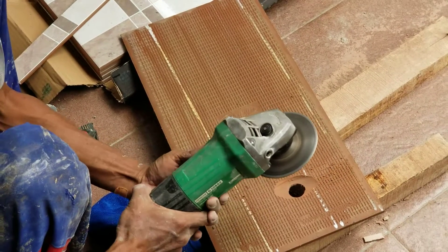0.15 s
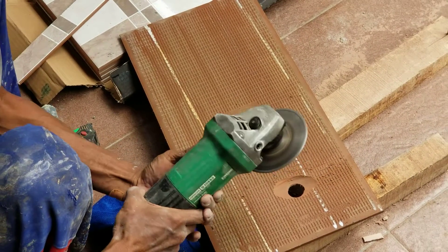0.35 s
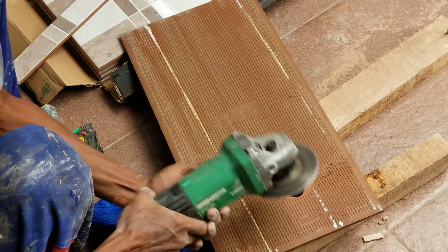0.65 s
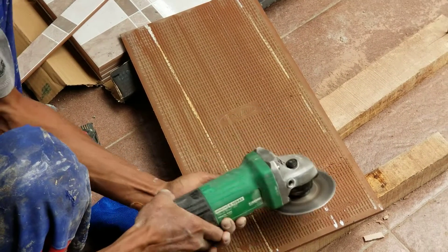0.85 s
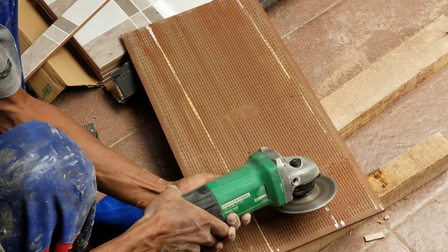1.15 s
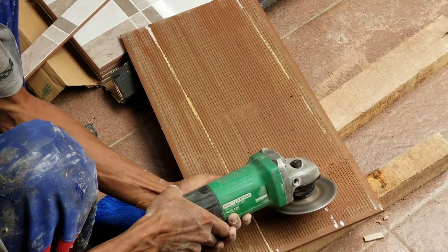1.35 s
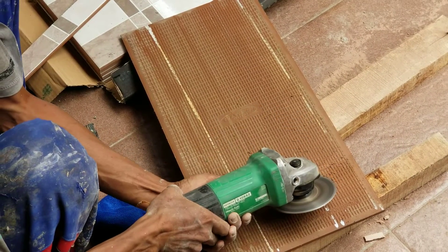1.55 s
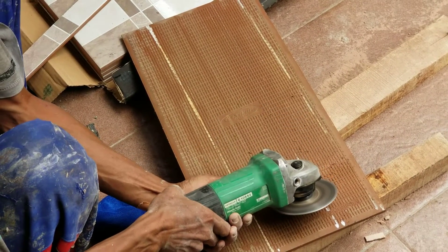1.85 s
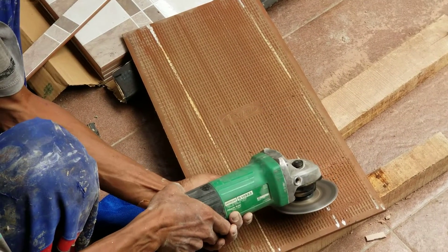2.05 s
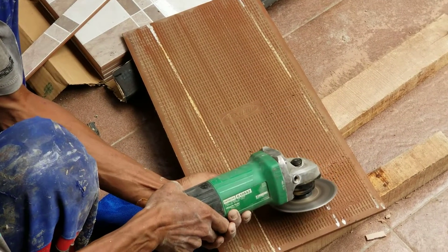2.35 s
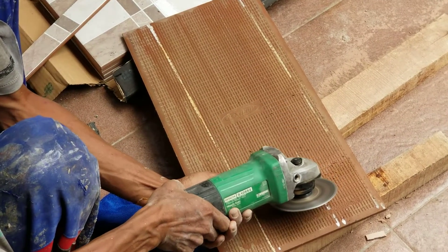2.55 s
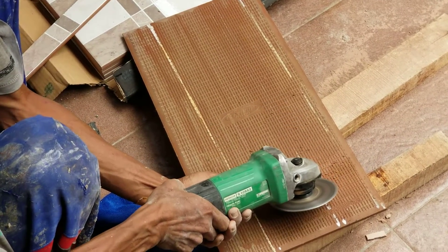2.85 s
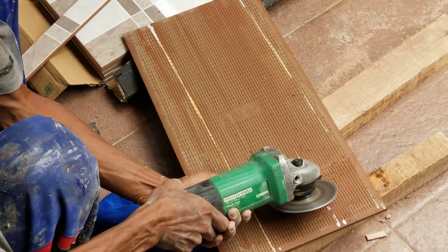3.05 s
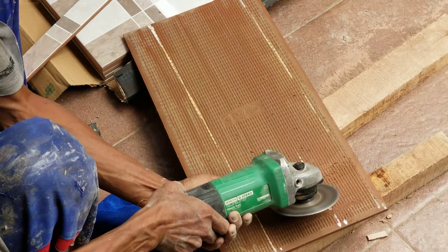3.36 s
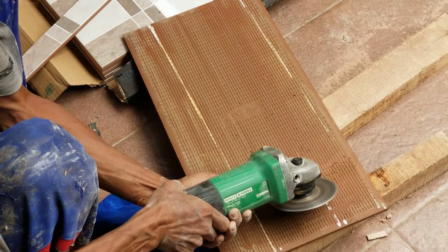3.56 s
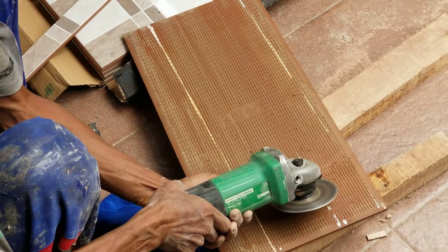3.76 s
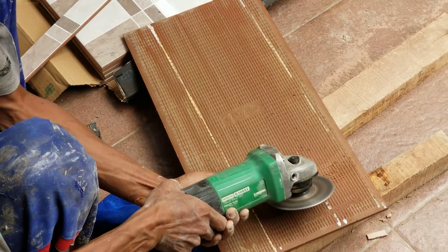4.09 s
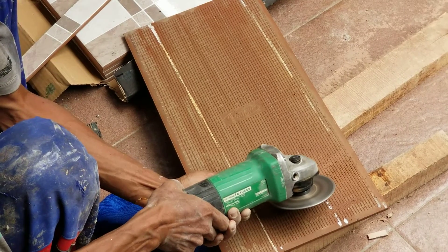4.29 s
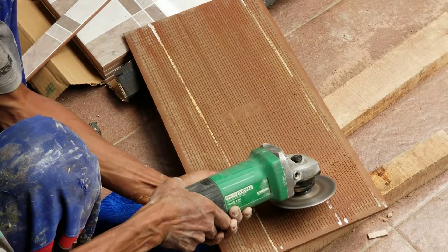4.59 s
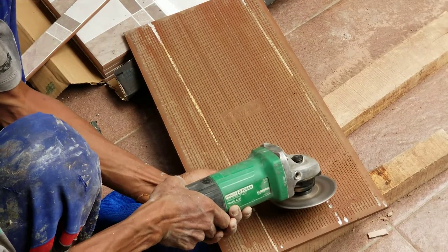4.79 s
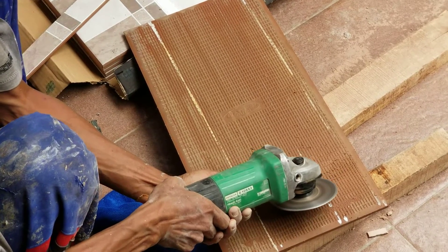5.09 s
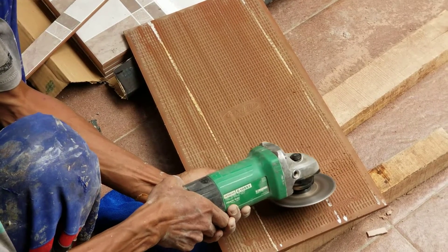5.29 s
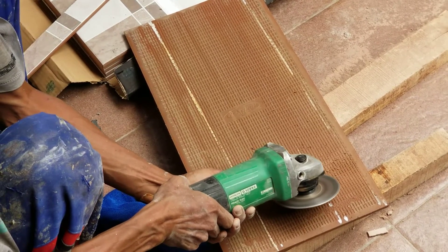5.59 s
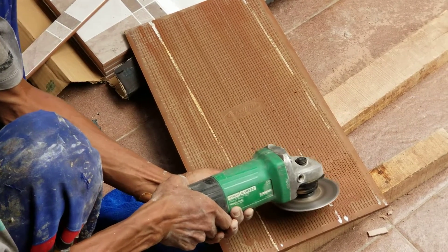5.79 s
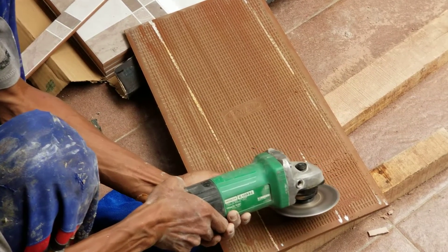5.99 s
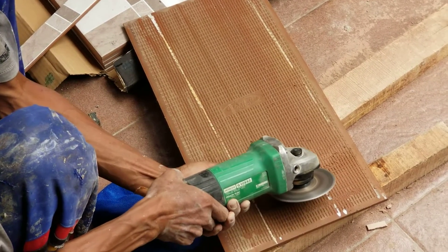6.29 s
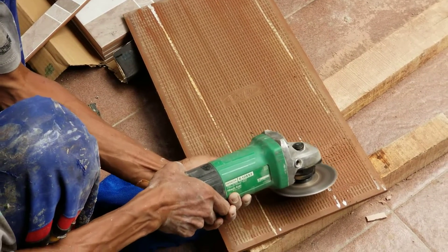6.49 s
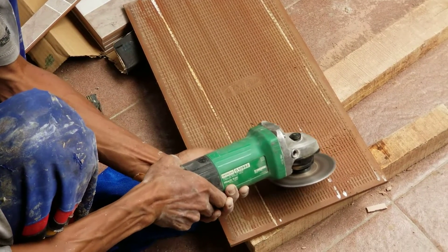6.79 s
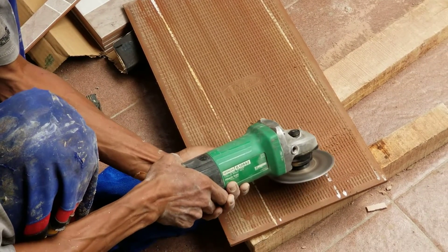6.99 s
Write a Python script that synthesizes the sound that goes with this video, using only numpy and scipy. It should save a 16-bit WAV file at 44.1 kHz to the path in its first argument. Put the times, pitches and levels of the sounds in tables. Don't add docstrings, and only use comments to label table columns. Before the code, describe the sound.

An angle grinder switches on with a jerk, whines up to speed, then grinds a ceramic tile in seven harsh, ringing passes.

```python
import sys
import numpy as np
from scipy import signal
from scipy.fft import rfft, irfft, next_fast_len
from scipy.io import wavfile
from scipy.ndimage import uniform_filter1d

SR = 44100
rng = np.random.default_rng(int(sys.argv[2]) if len(sys.argv) > 2 else 0)


def log_audio(samples):
    frames = np.atleast_2d(samples).T
    limited = np.clip(frames, -1, 1)
    pcm = np.round(limited * 32767).astype(np.int16)
    wavfile.write(sys.argv[1], SR, pcm)


def nominal_scale(level):
    x = np.asarray(level, float) / 20
    return 10 ** x


N = 314874
TIME = np.arange(N) / SR

# (time [s], grit level [dB])
PASSES = [
    [(1.45, -48), (1.574, -28), (1.63, -26), (1.808, -21.5), (1.868, -21), (2.08, -24.5), (2.13, -62)],
    [(2.365, -22.5), (2.389, -29.5), (2.547, -20.5), (2.729, -21), (2.777, -21.5), (2.8, -23), (3.161, -19),
     (3.287, -20), (3.33, -44)],
    [(3.57, -33), (3.648, -26.5), (3.81, -20), (3.856, -24.5), (3.93, -42)],
    [(4.08, -26.5), (4.112, -39), (4.22, -21.5), (4.25, -25), (4.308, -22), (4.402, -23), (4.878, -19.5),
     (4.974, -23.5), (5.06, -39)],
    [(5.22, -50), (5.27, -27), (5.356, -22.5), (5.424, -20), (5.72, -21.5), (5.755, -17), (5.84, -20.5),
     (5.915, -28), (5.96, -57)],
    [(6.295, -20), (6.317, -22.5), (6.46, -22), (6.495, -18.5), (6.525, -17), (6.55, -24), (6.597, -24),
     (6.635, -58)],
    [(6.925, -19.5), (6.989, -28), (7.005, -19), (7.1, -19.5), (7.2, -27)],
]
# (low modes [dB rel], 3rd multiple [dB], 4th at touch [dB], 7th [dB], 12th [dB])
SEATING = [(-15, -46, -41, -41, -55), (-12, -49, -46, -46, -45.5), (-20, -47, -47, -42, -47),
           (-9, -46, -41.5, -63, -44), (-11.5, -38.5, -40, -56, -45), (-10.5, -48, -42.5, -48, -36.5),
           (-14, -49, -46, -50, -39.5)]
# (3rd multiple [dB/s], 7th [dB/s], treble modes [dB rel], rumble [dB rel], 2nd multiple [dB rel])
SEATING_SHIFT = [(3, -5.5, 0.5, 2.5, -4), (6.5, 0.5, 2.5, 1.5, -5.5), (-10, -6, 1, 0.5, -3),
                 (1.5, 5, 1, 1.5, 2), (-18.5, -29, -0.5, -2, -5.5), (37, -40, -1, -3, -3),
                 (-34, -30, -1, -4, -2)]
# (frequency [Hz], width [Hz], level [dB])
DISC = [(2200, 95, -9), (2390, 56, -10), (3390, 70, -9), (3600, 32, -3), (4220, 71, -5), (4530, 90, -1.5),
        (4890, 43, -1), (5610, 66, -2), (6140, 48, -15), (6720, 55, -17), (7210, 86, -14), (7660, 130, -28),
        (8120, 64, -22), (8490, 48, -16), (8750, 54, -21), (9360, 42, -12), (9730, 130, -24),
        (10200, 58, -21), (10500, 39, -24), (11000, 140, -15), (11300, 39, -21), (12030, 55, -6),
        (12900, 67, -14), (13630, 110, -6.5), (14600, 45, -16), (15000, 58, -12), (15600, 110, -13)]
# (frequency [Hz], width [Hz], level [dB])
FLANGE = [(3610, 26, -6.5), (3790, 35, -10), (3980, 40, -8), (4340, 40, -7), (4505, 28, -1), (4655, 40, -5),
          (4950, 26, -5), (5260, 300, -15), (5640, 14, -3.5)]
# (frequency [Hz], width [Hz], level [dB])
TILE = [(315, 42, -15), (668, 147, -5), (1029.5, 17.5, 4.5), (1274, 22, 6), (1440, 160, 0.5), (1464, 51, 7)]
# (frequency [Hz], level [dB per Hz])
DUST = [(120, -71), (200, -93), (480, -13.5), (526, -24.5), (758, -31), (1150, -12), (1440, -6.5),
        (2980, -5), (4540, 9), (5250, -17), (7290, -6.5), (7700, -64), (13300, 0), (15700, -57)]
FULL_PRESSURE_DB = -21
TREBLE_DB, TREBLE_FOLLOWS = -7, -0.38
LOW_FOLLOWS, LOW_WANDER_DB = -0.2, 5
RUMBLE_DB, RUMBLE_FADE_DB_PER_S = -10.5, 3
RUMBLE_FOLLOWS = -0.8

# (multiple of the disc speed [1], level [dB])
OTHER_MULTIPLES = [(5, -51), (6, -76), (8, -42), (9, -47.5), (11, -46), (13, -46), (14, -38), (24, -29.5),
                   (25, -56)]
SECOND_DB = -55.5
FOURTH_FADE_DB_PER_S2, TWELFTH_WANDER_DB = 80, 3.5
TWELFTH_MODE_HZ, TWELFTH_MODE_WIDTH_HZ = 2190, 60

# (time [s], speed [turns/s])
FREE_SPEED = [(0.21, 160), (0.3, 305), (0.35, 378), (0.45, 440), (0.55, 482), (0.65, 503), (0.9, 548),
              (1.1, 570), (1.4, 594)]
# (time [s], speed [turns/s])
LOADED_SPEED = [(1.5, 182.5), (2.09, 181), (2.39, 182.5), (2.84, 181.6), (3.29, 178.9), (3.6, 182.4),
                (3.89, 179.8), (4.11, 182.7), (4.414, 180.8), (4.576, 173.9), (4.714, 171.2), (5.26, 174.1),
                (5.37, 176), (5.55, 174.2), (5.89, 173.3), (6.32, 178.1), (6.55, 180.3), (7.0, 182.5)]
GEAR_RATIO, PINION_TEETH, MAINS_PULSE_HZ = 3.265, 11, 100
SWITCH_S, SPEED_SETTLE_S = 0.2138, 0.04

# (time [s], tile [dB], gear case [dB], bright metal [dB], chatter [ms])
BLOWS = [
    (0.2147, -26, -17, -34, 1.6),
    (0.994, -48.5, -39, -15, 6.8),
    (1.452, -38.5, -38, -12.5, 6.5),
    (2.369, -29.5, -19, -22, 1.8),
    (3.575, -34, -24, -26, 3.7),
    (4.089, -50, -37, -7, 1.6),
    (5.245, -38.5, -39, -38, 75),
    (5.321, -42.5, -13, -29.5, 2.7),
    (6.298, -33, -29, -38, 6.8),
    (6.925, -34, -31, -32, 2),
]
# (time [s], gear case rattle [dB])
RUN_UP = [(0.214, -30), (0.3, -25), (0.385, -17), (0.49, -25), (0.535, -21), (0.56, -27), (0.575, -18.5),
          (0.64, -23), (0.912, -38)]
# (frequency [Hz], width [Hz], level [dB])
GEAR_CASE = [(4250, 225, 6.5), (4684, 43, 4.5), (696, 81, -13), (1230, 850, -16.5)]
# (frequency [Hz], width [Hz], level [dB])
GUARD = [(12130, 260, 0), (12380, 260, -1), (15450, 400, -9)]
COASTING_RATTLE_DB = -36.5
WHINE_DB, WHINE_BEST_HZ, WHINE_BELOW_DB_PER_OCT, WHINE_ABOVE_DB_PER_OCT = -31.5, 3900, 4, 28
COASTING_GUARD_DB, GUARD_DB, GUARD_PEAK_DB, GUARD_PEAK_S, GUARD_SPAN_S = -38.5, -37, 9.5, 0.5, 0.15
GUARD_ENTERS_S, GUARD_MUTED_DB = 0.37, -7

# (frequency [Hz], level [dB per Hz])
FAN = [(24, -64), (40, -19), (162, -32), (370, -15.5), (440, -17.5), (595, -9), (657, -17), (980, -10.5),
       (1500, -12), (2020, 0.5), (3020, -0.5), (4610, -1), (8000, -20.5), (14200, -14), (15700, -20)]
COASTING_DB, POWERED_DB = -41.5, -33.5
COASTING_HOUSING_DB, POWERED_HOUSING_DB = -18, -12
LOAD_DUCK_DB, DUCK_RECOVER_S = -4, 0.23

# (time [s], left over right [dB], treble [dB rel])
AIM = [(0.15, 8.5, -1.5), (0.25, 10, -4.5), (0.46, 15, -0.5), (1.31, 5, -5), (1.44, 4.5, -5),
       (2.3, 6.5, -4), (4, 5.5, -5), (6.1, 6.5, -6), (6.8, 5.5, -4.5)]
# (frequency [Hz], lead of the left [rad])
LEAD = [(0, 0), (2410, -0.5), (2930, 1.9), (3960, 1.6), (4570, 0.8), (5600, 1.9), (6720, 0.6), (8440, -6.6),
        (10200, -3.8), (11000, -6.5), (12500, -4.7), (13600, -6.1), (14600, -5.6), (16100, -11.8)]
# (frequency [Hz], left over right [dB])
SIDES = [(60, -4), (110, -1), (200, 7.5), (380, 5), (700, 5.5), (1290, 3), (2380, -1), (4400, 1.5),
         (8120, 6), (15000, 3)]
# (frequency [Hz], share of power [0-1])
UNLIKE = [(60, 0.35), (300, 0.025), (1000, 0.18), (4000, 0.18), (8000, 0.1), (12000, 0.088)]
# (time [s], level [dB])
HANDLING = [(0, -55), (0.6, -48), (0.75, -56), (1.1, -71.5), (6.9, -70), (7.14, -53)]
MIC_LOW_HZ, MIC_HIGH_HZ = 150, 15720


def rms_one(x):
    return x / np.sqrt(np.mean(x ** 2) + 1e-20)


def in_time(rows):
    s, *columns = np.transpose(rows)
    return [np.interp(TIME, s, column) for column in columns]


def at_hz(points, hz):
    table_hz, value = np.transpose(points)
    return np.interp(np.log(hz + 1), np.log(table_hz + 1), value)


def lag(x, seconds):
    r = np.exp(-1 / (max(seconds, 0.005) * SR))
    return signal.lfilter([1 - r], [1, -r], x)


def drift(rate):
    r = np.exp(-40 * np.pi * rate / SR)
    noise = rng.standard_normal(N // 20 + 4002)
    slow = signal.lfilter([1], [1, -2 * r, r * r], noise)[4000:]
    return np.interp(np.arange(N) / 20, np.arange(len(slow)), rms_one(slow))


def filtered(x, order, hz, kind):
    return signal.sosfilt(signal.butter(order, hz, kind, fs=SR, output="sos"), x)


def colour(x, spectrum):
    size = next_fast_len(N)
    gain = nominal_scale(at_hz(spectrum, np.fft.rfftfreq(size, 1 / SR)))
    return rms_one(irfft(rfft(x, size) * gain, size)[:N])


def resonate(x, modes, wander_db=0.0):
    out = np.zeros(N)
    for k, (hz, width, db) in enumerate(modes):
        r = np.exp(-np.pi * max(width, 5) / SR)
        drive = x * nominal_scale(db + (wander_db * drift(16.4) if wander_db else 0))
        peak = [(1 - r * r) / 2, 0, (r * r - 1) / 2]
        ring = [1, -2 * r * np.cos(2 * np.pi * hz / SR), r * r]
        out += (-1) ** k * signal.lfilter(peak, ring, drive)
    return out


def noise_gain(modes):
    return np.sqrt(sum(np.pi * width / SR * nominal_scale(2 * db) for hz, width, db in modes))


def grit(per_s, spread_db):
    sizes = nominal_scale(spread_db * np.minimum(rng.exponential(1, N), 5)) * rng.choice([-1, 1], N)
    return rms_one(sizes * (rng.random(N) < per_s / SR))


def mains_throb(depth_db):
    beat = MAINS_PULSE_HZ * (TIME - SWITCH_S) + 30
    kick = uniform_filter1d(1 - 2 * (beat % 1), size=60)
    strength = rng.standard_normal(N)[beat.astype(int)]
    return nominal_scale(depth_db * (1.3 * kick + 0.3 * strength))


def touching():
    edges = []
    for curve in PASSES:
        touch, lift = curve[0][0], curve[-1][0]
        edges += [(touch, 0), (touch + 0.003, 1), (lift - 0.03, 1), (lift, 0)]
    return in_time(edges)[0]


def grit_level():
    return in_time(np.vstack(PASSES))[0]


def this_pass(table):
    touches = np.array([curve[0][0] for curve in PASSES])
    index = np.maximum(np.searchsorted(touches, TIME) - 1, 0)
    return np.maximum(TIME - touches[index], 0), np.array(table)[index].T


def disc_angle():
    free = in_time(FREE_SPEED)[0] / GEAR_RATIO
    loaded = in_time(LOADED_SPEED)[0]
    return 2 * np.pi * np.cumsum(free + (loaded - free) * lag(touching(), SPEED_SETTLE_S)) / SR


def cutting(angle):
    grit_db = grit_level()
    since, seating = this_pass(SEATING)
    shift = this_pass(SEATING_SHIFT)[1]
    swing_db = grit_db - FULL_PRESSURE_DB
    treble_db = shift[2] + TREBLE_DB + TREBLE_FOLLOWS * swing_db
    low_db = seating[0] + LOW_FOLLOWS * swing_db + LOW_WANDER_DB * drift(1.7)
    tile_db = shift[3] + RUMBLE_DB + RUMBLE_FOLLOWS * swing_db - RUMBLE_FADE_DB_PER_S * since

    bite_db = 2.2 * np.cos(angle) + 1.3 * np.cos(2 * angle) + 0.9 * drift(34)
    force = touching() * nominal_scale(grit_db) * rms_one(nominal_scale(bite_db) * mains_throb(0.4))

    out = np.zeros(N)
    bands = [(0, 3100, low_db - 3.5), (3100, 6300, -2.05), (6300, 17000, treble_db - 0.6)]
    for low_hz, high_hz, band_db in bands:
        modes = [(hz, 0.64 * width, db) for hz, width, db in DISC + FLANGE if low_hz < hz < high_hz]
        grains = grit(9000, 2.97)
        out += resonate(grains * force * nominal_scale(band_db), modes, 2.37) / noise_gain(modes)
    grains = grit(3000, 1.7)
    out += resonate(grains * force * nominal_scale(tile_db - 4.5), TILE, 1.5) / noise_gain(TILE)
    dust = colour(grit(12000, 3.7), DUST)
    return out + force * nominal_scale(-3.5) * dust


def run_out(angle):
    since, (_, third_db, fourth_db, seventh_db, twelfth_db) = this_pass(SEATING)
    shift = this_pass(SEATING_SHIFT)[1]
    pressure_db = grit_level() + 19.04
    second_db = SECOND_DB + shift[4] + pressure_db
    third_db = third_db + shift[0] * since + 0.1 * pressure_db
    fourth_db = fourth_db - np.minimum(FOURTH_FADE_DB_PER_S2 * since ** 2, 16)
    seventh_db = seventh_db + shift[1] * since
    detune = (12 * in_time(LOADED_SPEED)[0] - TWELFTH_MODE_HZ) / TWELFTH_MODE_WIDTH_HZ
    twelfth_db = twelfth_db + 5.5 + 0.78 * pressure_db - 10 * np.log10(1 + detune ** 2)
    twelfth_db = twelfth_db + TWELFTH_WANDER_DB * drift(10.0)

    tones = [(2, second_db), (3, third_db), (4, fourth_db), (7, seventh_db), (12, twelfth_db)]
    tones += [(k, db + pressure_db + 2.5 * drift(3.8)) for k, db in OTHER_MULTIPLES]
    thump = np.zeros(N)
    for k, db in tones:
        level = np.sqrt(2) * nominal_scale(db + 1.9 * drift(12.5))
        thump += level * np.sin(k * angle + 1.1 * drift(2.3))
    return lag(touching(), 0.016) * thump


def blows():
    tile, case, metal = np.zeros(N), np.zeros(N), np.zeros(N)
    for at, tile_db, case_db, metal_db, ms in BLOWS:
        attack = np.clip((TIME - at) / 0.00051, 0, 1)
        shape = attack * np.exp(-np.clip(TIME - at, 0, 1) * 1000 / max(ms, 0.5))
        tile += shape * nominal_scale(tile_db)
        case += shape * nominal_scale(case_db)
        metal += shape * nominal_scale(metal_db)
    chatter, down = rng.standard_normal(N), touching()
    thud = nominal_scale(27.5) * resonate(tile * chatter, TILE) + nominal_scale(9.0) * tile * colour(chatter, FAN)
    bright_disc = [mode for mode in DISC if mode[0] > 6300]
    ring = nominal_scale(13.5) * resonate(metal * chatter * down, bright_disc)
    ring += nominal_scale(16) * resonate(metal * chatter * (1 - down), GUARD)
    clank = np.sin(2 * np.pi * 4330 * TIME) * (1 - down) + 3.3 * chatter
    return thud + ring + nominal_scale(9.5) * resonate(case * clank, GEAR_CASE[:2])


def gears(angle):
    on = TIME > SWITCH_S
    fade = np.clip((1.4 - TIME) / 0.3, 0, 1)

    octaves = np.log2(PINION_TEETH * in_time(FREE_SPEED)[0] / WHINE_BEST_HZ)
    whine_db = WHINE_DB + np.minimum(WHINE_BELOW_DB_PER_OCT * octaves, -WHINE_ABOVE_DB_PER_OCT * octaves)
    powered = np.clip((TIME - 0.22) / 0.002, 0, 1) * np.clip((0.75 - TIME) / 0.2, 0, 1)
    mesh = PINION_TEETH * GEAR_RATIO * angle + 1.45 * drift(200)
    teeth = np.sin(mesh) + 0.15 * np.sin(2 * mesh) + 0.087 * np.sin(3 * mesh)
    whine = rms_one(teeth * mains_throb(6.5)) * nominal_scale(whine_db + 9.5) * powered

    rattle_db = np.where(on, in_time(RUN_UP)[0], COASTING_RATTLE_DB)
    knocks = grit(6000, 2.5) * np.where(TIME > 0.21, mains_throb(6.0), 1)
    case = fade * nominal_scale(rattle_db - 1.0) * rms_one(resonate(knocks, GEAR_CASE, 1.3))

    guard_db = GUARD_DB + GUARD_PEAK_DB * np.exp(-((TIME - GUARD_PEAK_S) / GUARD_SPAN_S) ** 2)
    guard_db = guard_db + GUARD_MUTED_DB * (TIME < GUARD_ENTERS_S)
    guard_db = np.where(on, guard_db, COASTING_GUARD_DB)
    guard_db = fade * guard_db - 51 * (1 - fade)
    guard_knocks = grit(6900, 4.3) * mains_throb(3.4)
    guard = nominal_scale(guard_db + 1.0) * rms_one(resonate(guard_knocks, GUARD, 3.0))
    return whine + case + guard


def motor(angle):
    on = np.arange(N) > SWITCH_S * SR
    treble_db = in_time(AIM)[1]
    level_db = np.where(on, POWERED_DB, COASTING_DB)
    body_db = np.where(on, POWERED_HOUSING_DB, COASTING_HOUSING_DB)
    hiss = colour(rng.standard_normal(N), FAN) * mains_throb(1.4) * nominal_scale(1.06 * drift(42))
    high = filtered(hiss, 2, 5500, "high")
    body = filtered(hiss, 1, [650, 1700], "band")
    hiss = hiss + (nominal_scale(treble_db + 8.5) - 1) * high + (nominal_scale(body_db + 14.0) - 1) * body

    settled = np.clip((TIME - 0.75) / 0.15, 0, 1)
    unbalance = nominal_scale(-20.0 + 2.7 * drift(17)) * np.sin(GEAR_RATIO * angle) * settled
    hum = nominal_scale(-18.5) * np.sin(2 * np.pi * 598 * TIME + 1.0 * drift(28))
    hum = hum * (np.arange(N) < SWITCH_S * SR)

    load = touching() * nominal_scale(grit_level() - FULL_PRESSURE_DB)
    ducked = nominal_scale(LOAD_DUCK_DB * lag(load, DUCK_RECOVER_S))
    return nominal_scale(level_db + 4.0) * ducked * (hiss + unbalance + hum)


def handling():
    low = filtered(rng.standard_normal((3, N)), 2, [18, 70], "band")
    low = low[:2] + 0.32 * low[2]
    return rms_one(low) * nominal_scale(in_time(HANDLING)[0] + 4.3 * drift(5.8) + [[4.0], [-1.5]])


def stereo(x):
    size = next_fast_len(N + SR // 2)
    hz = np.fft.rfftfreq(size, 1 / SR)
    share = np.clip(at_hz(UNLIKE, hz), 0, 1)
    echoes = rng.standard_normal(N) * np.exp(-TIME / 0.037)
    echoes = rfft(echoes / np.sqrt(np.sum(echoes ** 2)), size)
    sign = np.array([[1], [-1]])
    ports = nominal_scale(sign * at_hz(SIDES, hz) / 2) * np.exp(0.5j * sign * at_hz(LEAD, hz))
    ports = ports / np.maximum(np.abs(ports.mean(axis=0)), 0.5)
    room = np.sqrt(1 - share) + sign * np.sqrt(share) * echoes
    both = irfft(rfft(x, size) * ports * room, size)[:, :N]
    return both * nominal_scale(0.88 + sign * (in_time(AIM)[0] - 4.0) / 2)


def scene():
    angle = disc_angle()
    tool = cutting(angle) + run_out(angle) + blows() + gears(angle) + motor(angle)
    return stereo(filtered(tool, 2, MIC_LOW_HZ, "high")) + handling()


def roll_off(x):
    return signal.sosfilt(signal.butter(12, 16500, fs=SR, output="sos"), x)


def record(dry):
    rounded = 0.88 * np.tanh(dry / 0.88)
    cut = filtered(rounded, 2, MIC_LOW_HZ, "high")
    mix = signal.sosfilt(signal.ellip(10, 0.5, 60, MIC_HIGH_HZ, fs=SR, output="sos"), cut)
    return roll_off(mix)


dry = scene()
out = record(dry)
log_audio(out)
```